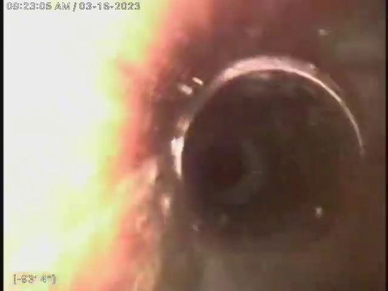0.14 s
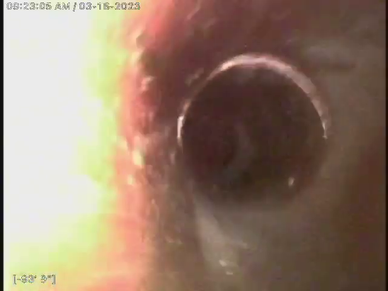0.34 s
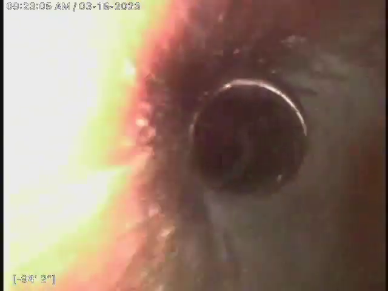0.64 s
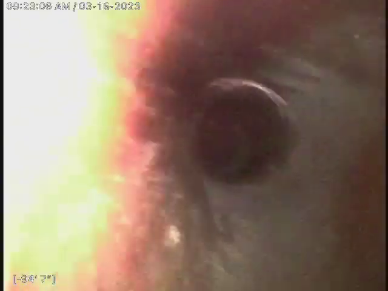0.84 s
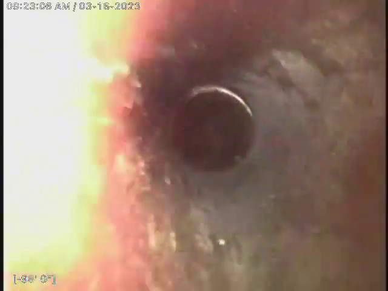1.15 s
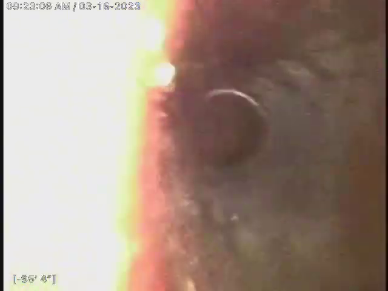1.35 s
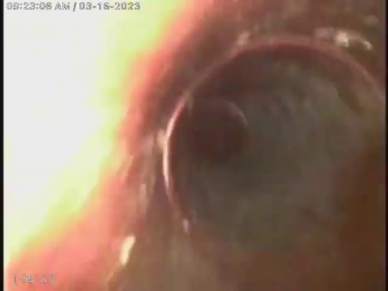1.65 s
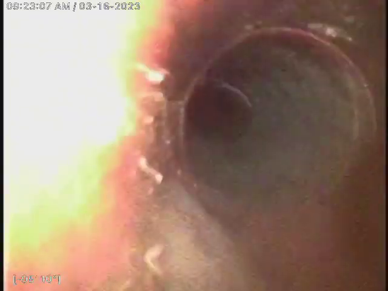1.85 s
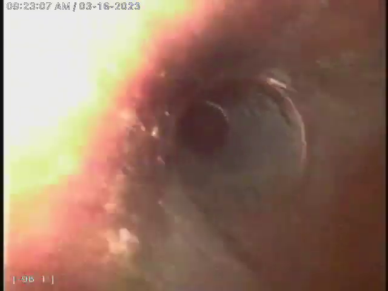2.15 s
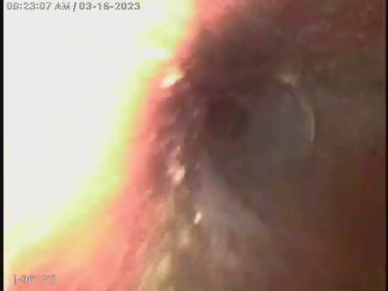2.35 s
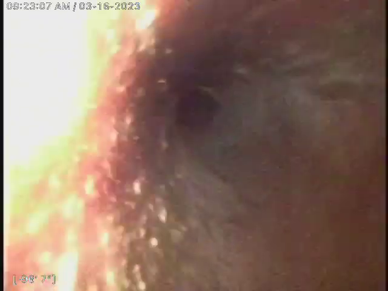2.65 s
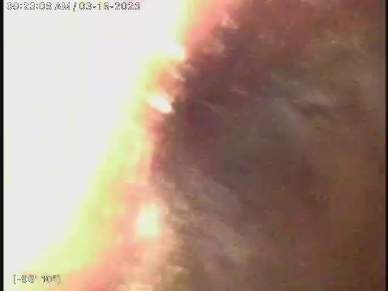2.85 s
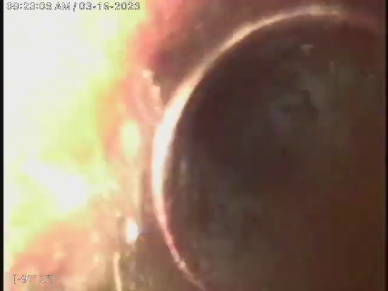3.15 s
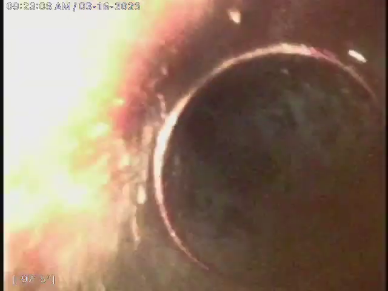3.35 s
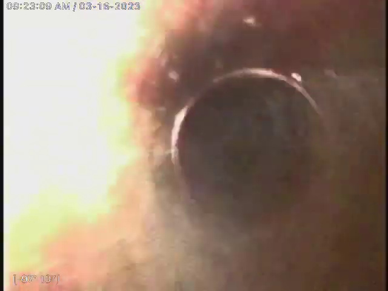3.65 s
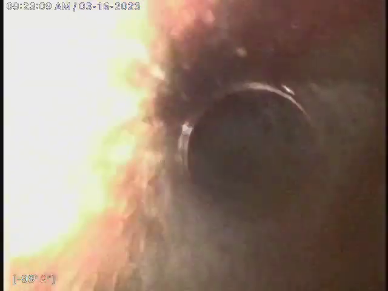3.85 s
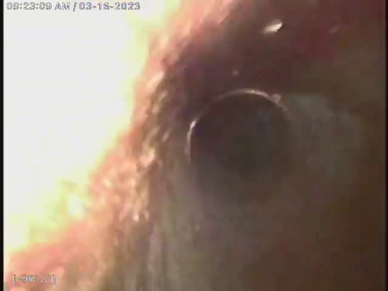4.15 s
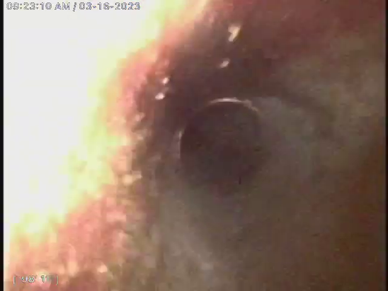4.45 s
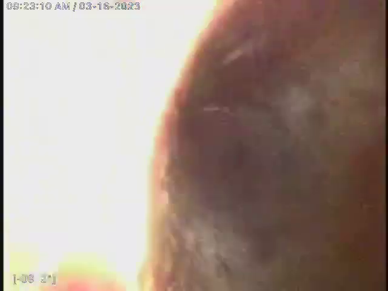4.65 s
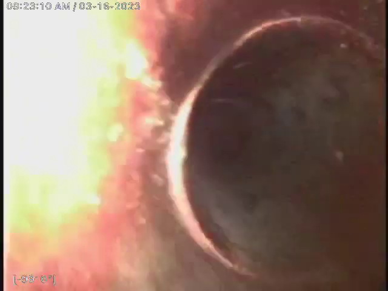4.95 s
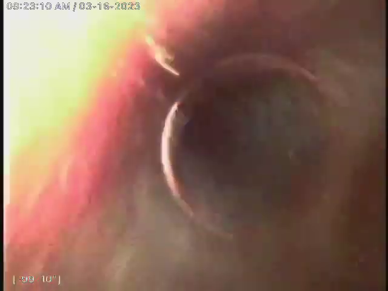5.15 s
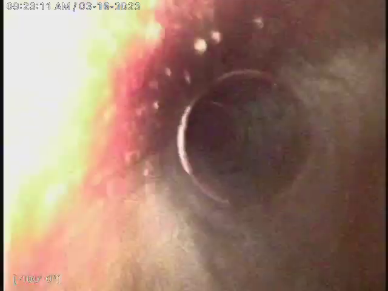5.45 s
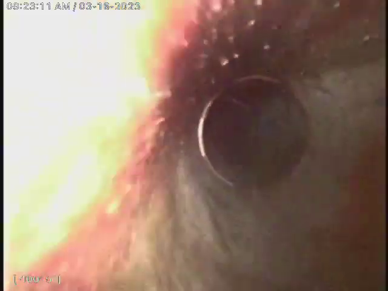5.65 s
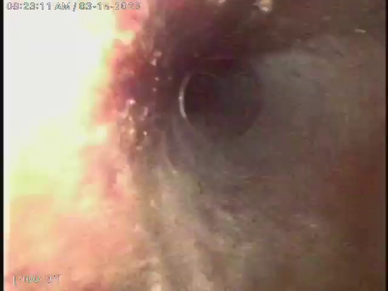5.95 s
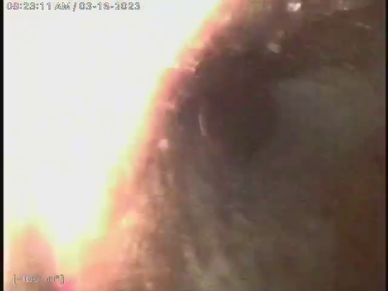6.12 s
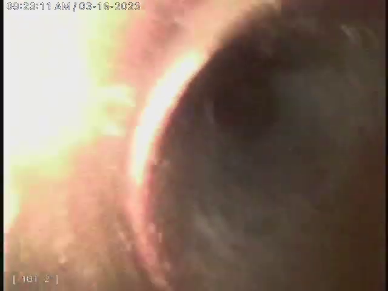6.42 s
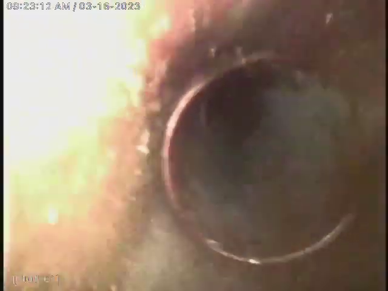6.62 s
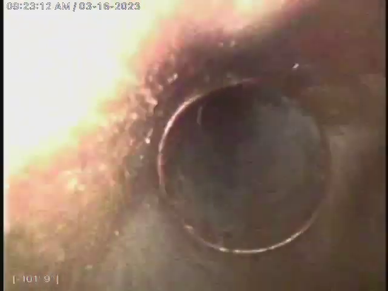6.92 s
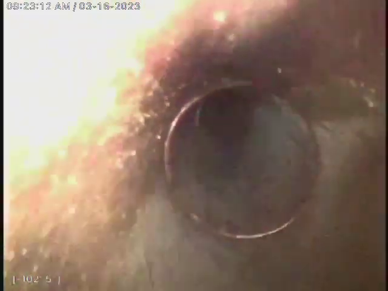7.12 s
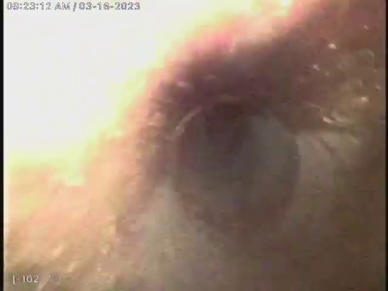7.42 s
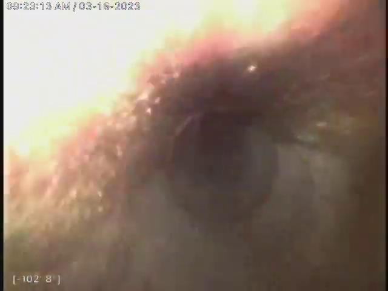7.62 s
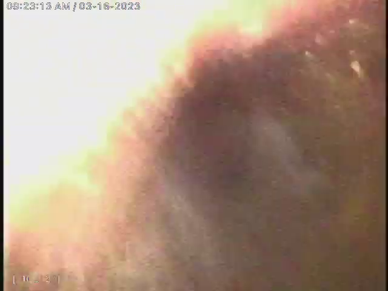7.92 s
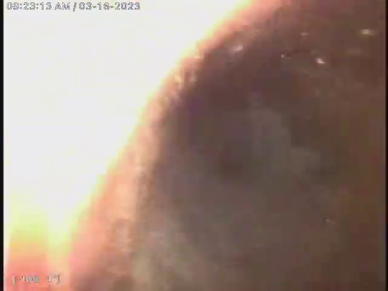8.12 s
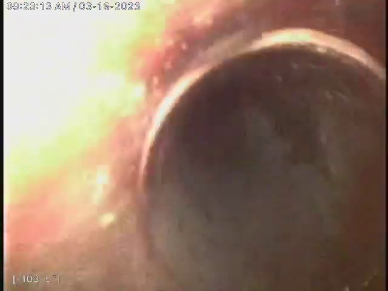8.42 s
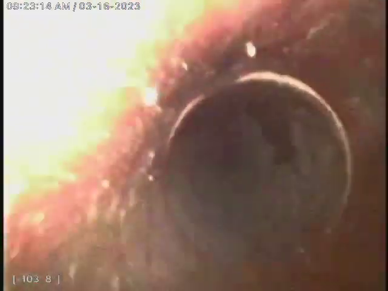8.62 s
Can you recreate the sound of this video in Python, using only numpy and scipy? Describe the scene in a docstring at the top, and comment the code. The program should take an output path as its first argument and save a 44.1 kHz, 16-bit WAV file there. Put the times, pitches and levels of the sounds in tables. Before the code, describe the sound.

A pipe inspection rod is pulled back throughout, about two pulls a second, each a soft, low, hollow rub that swells and fades with gritty ticks and occasional faint dry squeaks. A steady low drone and soft hiss lie underneath. The rod knocks and rattles in its reel, making the frame ring briefly. A loud, sharp clatter comes at 1.5 seconds, smaller knocks at 3.4 and 3.7, another loud clatter around 4.5, single knocks at 6.3 and 6.8, and a third loud clatter at 7.6. Light taps follow from 8 to 8.7 seconds. Some way off, a small bird faintly whistles, trills and gives a short buzz during the first three seconds. A more distant bird whistles and chirps from about 4 to 7 seconds. Everything is heard through one microphone at the rig, with little echo on the knocks and no high treble.

```python
"""A sewer camera's push rod is drawn back through a buried pipe, about two pulls a second.
The rod rubs on its guide, louder the faster it slides, with ticks of dirt and brief dry squeaks.
It knocks and rattles in the reel, and the reel's frame rings. Two small birds whistle and trill
some way off, over a low drone and hiss. The sound has no treble above 7 kHz."""
import sys
import numpy as np
from scipy import signal
from scipy.fft import rfft, irfft, next_fast_len
from scipy.io import wavfile

SR = 44100
rng = np.random.default_rng(int(sys.argv[2]) if len(sys.argv) > 2 else 0)


def pcm_store(signal):
    """Save signal as 16-bit PCM."""
    levels = np.round(np.clip(np.atleast_2d(signal), -1, 1) * 32767)
    wavfile.write(sys.argv[1], SR, levels.astype(np.int16).T)


N = 387198


# The pulls on the rod. Each row: start in seconds, length in seconds, relative level in dB.
PULLS = [(-0.05, 0.38, -43), (0.365, 0.43, -47), (0.903, 0.46, -52.5), (1.27, 0.69, -38.5),
         (1.948, 0.59, -43.5), (2.493, 0.57, -42.5), (2.865, 0.59, -49.5), (3.248, 0.75, -47),
         (3.94, 0.18, -48.5), (4.272, 0.55, -38), (4.861, 0.51, -39.5), (5.414, 0.81, -42.5),
         (6.193, 0.4, -41), (6.622, 0.37, -52.5), (7.07, 0.35, -45.5), (7.412, 0.65, -43.5),
         (8.044, 0.51, -43.5), (8.651, 0.45, -38.5)]

def pulls(skew=0.73, rub_power=1.85):
    """Each pull speeds up and slows again, so the rubbing swells and fades."""
    t, power = np.arange(N) / SR, np.zeros(N)
    for start, length, db in PULLS:
        progress = np.clip((t - start) / length, 0, 1)
        speed = abs(np.sin(np.pi * progress ** skew))  # a skew under 1 peaks early
        power += (gain_of(db) * speed ** rub_power) ** 2
    return np.sqrt(power)


# The tone of the rubbing. Each row: frequency in Hz, relative level in dB.
RUB_TONE = [(50, -15.5), (90, 9.5), (130, 10), (170, 14), (330, 7), (600, 0.5), (860, -5.5), (1450, -10),
            (2600, -12.5), (4000, -15.5), (6600, -24), (7000, -50)]

def rubbing(slide_db=2.5, grit_db=-8, creep_db=-59.5, flutter_db=2.5, sizzle_db=-14):
    """Sliding friction and grit, heard through the hollow reel; each pull adds a little hiss."""
    pull = pulls()
    creep = gain_of(creep_db) * lull()  # the rod creeps on between pulls
    friction = gain_of(slide_db) * noise(RUB_TONE) + gain_of(grit_db) * grit()
    sizzle = gain_of(sizzle_db) * pull * noise([(1500, -27), (4000, -1), (6500, 5.5), (7000, -22)])
    flutter = gain_of(flutter_db * wander(N, rate_hz=13.7))
    return (friction * np.hypot(pull, creep) + sizzle) * flutter


def grit(per_s=340, spread_db=3.5, quality=6.5, low_hz=760, high_hz=1170, pitches=8):
    """Dirt on the rod catches at random, each time with a short hollow tick."""
    ticks = np.zeros(N)
    for hz in np.linspace(low_hz, high_hz, pitches):
        size = gain_of(spread_db * np.minimum(rng.exponential(1, N), 3))
        catches = size * (rng.random(N) < per_s / pitches / SR)
        ticks += resonate(resonate(catches, hz, quality), hz, quality) / np.sqrt(hz)
    return evened(ticks)


# The rod's knocks. Each row: start in seconds, rattle level in dB, rattle length in seconds,
# added brightness in dB per octave, jolt level in dB, pitch of the clunk in Hz.
KNOCKS = [(0.64, -40, 0.027, 1.5, -33, 880), (0.690, -44, 0.0019, 6, -58, 1505),
          (1.325, -40.5, 0.0076, -1.5, -31.5, 299), (1.4599, -14.5, 0.0043, -2.5, -31, 643),
          (1.469, -9, 0.004, 0.5, -30, 380), (1.482, -10.5, 0.004, 0, -13.5, 1020),
          (1.4872, -11.5, 0.00872, 1, -13.5, 880), (1.648, -28, 0.0023, -2.5, -44, 520),
          (3.415, -26, .011, 1.5, -19, 235), (3.698, -28, 0.0027, -3, -31, 253),
          (4.4385, -16, .005, -1.5, -25, 800), (4.4455, -12.5, 0.015, -0.1, -28.5, 780),
          (4.464, -17.5, 0.0042, 3, -18, 277), (4.550, -21, 0.0045, 4.5, -25, 4130),
          (4.989, -37, 0.0022, -14, -41, 225), (5.042, -40, 0.0053, -5.5, -35, 228),
          (5.133, -31, 0.0064, 3.5, -50, 2070), (5.744, -53, 0.03, -11, -34.5, 95),
          (5.842, -42, 0.0052, -4, -43, 810), (6.3136, -21, .008, .5, -26.5, 340),
          (6.7974, -22, 0.008, -.5, -22.5, 168), (7.166, -41, 0.0019, -1.5, -49, 804),
          (7.6178, -14.5, 0.009, 0.5, -22, 680), (7.6301, -12.5, 0.012, 2.1, -17, 285),
          (7.6474, -12, 0.0039, 3, -17.5, 945), (7.794, -37, 0.028, -15, -35.5, 302),
          (8.074, -37.5, 0.002, -6.5, -52, 760), (8.126, -35.5, 0.012, -6, -47, 437),
          (8.156, -35, 0.002, -4, -40, 1090), (8.202, -39.5, 0.0026, -4, -46, 876),
          (8.235, -39, .003, -3, -44, 1090), (8.4566, -34, 0.0082, 2, -57, 2420),
          (8.682, -37.5, 0.023, -3.5, -46, 187), (8.733, -32.5, .035, -10.5, -52, 191)]
# The tone of the rattle. Each row: frequency in Hz, relative level in dB.
RATTLE_TONE = [(40, -40.5), (120, -9), (250, -1), (380, -2.5), (520, -8), (950, -9.5), (1300, -13),
               (1900, -15.5), (2800, -17), (4500, -24.5), (6800, -28)]
# The echo of the surroundings. Each row: frequency in Hz, seconds to fade by 60 dB.
ECHO_FADES = [(100, 0.51), (400, 0.24), (1500, 0.29), (6500, 0.38)]

def knocks(crack_s=0.0013, release_s=0.0059, bounces_per_s=7000, jolt_s=0.0006,
           clunk_db=3, thud_db=5, ring_db=-1, echo_db=-17):
    """The rod strikes the reel, chatters for a moment, and its weight jolts the frame."""
    t, ring = np.arange(SR // 4) / SR, frame_ring()
    push = np.exp(-t / jolt_s)
    jolt = signal.fftconvolve(ring, push / push.sum())  # a soft push wakes mostly low tones
    crack = np.exp(-t / crack_s)  # the first contact is the hardest
    rattles, jolts = np.zeros(N), np.zeros(N)
    for start, db, length, brightness, jolt_db, clunk_hz in KNOCKS:
        tone = [(hz, level + brightness * np.log2(hz)) for hz, level in RATTLE_TONE]
        contact = crack + np.exp(-np.maximum(t - length, 0) / release_s)
        bounces = contact * rng.standard_normal(len(t)) * (rng.random(len(t)) < bounces_per_s / SR)
        rattle = signal.fftconvolve(bounces, click(tone))
        # each struck spot favours its own pitch
        rattle += gain_of(clunk_db) * resonate(rattle, clunk_hz, quality=5)
        add(rattles, start, gain_of(db) * rattle * np.linalg.norm(contact) / np.linalg.norm(rattle))
        thud = jolt + gain_of(thud_db) * resonate(jolt, clunk_hz, quality=4)
        add(jolts, start + 0.85 * length, gain_of(jolt_db) * thud)  # late in the rattle
    # the chatter keeps the frame ringing too
    ringing = signal.fftconvolve(rattles, ring / abs(rfft(ring)).max())[:N]
    direct = along_rod(rattles + gain_of(ring_db) * ringing + jolts)
    return direct + gain_of(echo_db) * echoes(direct, ECHO_FADES)


# The reel frame's tones. Each row: pitch in Hz, relative level in dB, seconds to fade by 60 dB.
FRAME_TONES = [(94.8, 0.5, 0.16), (162.7, -6.5, 0.15), (199, -3.5, 0.12), (246.5, -9, 0.19),
               (270.4, -1.5, 0.11), (388.9, -5, 0.11), (659, -7, 0.12), (859, -12, 0.18),
               (1013, -12.5, 0.091), (1840, -13, 0.04), (2730, -6.5, 0.046)]

def frame_ring():
    """After one blow the frame rings with several fading tones at once."""
    t = np.arange(SR // 2) / SR
    return sum(gain_of(db - 60 * t / fade) * np.cos(2 * np.pi * hz * t) for hz, db, fade in FRAME_TONES)


def along_rod(x, lag_s=0.01149, corner_hz=479.5):
    """Low bending waves travel more slowly along the rod, so the bass arrives up to lag_s late."""
    size = next_fast_len(N + SR)
    turns = lag_s * corner_hz * np.arctan(np.fft.rfftfreq(size, 1 / SR) / corner_hz)
    return irfft(rfft(x, size) * np.exp(-2j * np.pi * turns), size)[:N]


# Dry brushes. Each row: middle in seconds, level in dB, half length in seconds, squeak pitch in Hz.
BRUSHES = [(0.12, -54.5, 0.23, 2420), (0.979, -48, 0.025, 2580), (1.111, -46.5, 0.039, 2420),
           (1.329, -48, 0.011, 2770), (2.705, -43, 0.027, 2500), (5.052, -53, 0.058, 2470),
           (5.659, -39.5, 0.015, 2460), (6.413, -41, 0.031, 2510)]
# The tone of a brush. Each row: frequency in Hz, relative level in dB.
BRUSH_TONE = [(300, -10.5), (900, 0.5), (1500, 7.5), (2600, 2), (3500, 1), (6800, -5.5)]

def brushes(flutter_db=2.5, squeak_db=8):
    """Short swells of dry, uneven friction, each with a faint squeak."""
    t, out = np.arange(SR // 2) / SR, np.zeros(N)
    middle = t.mean()
    for when, db, half, hz in BRUSHES:
        friction = noise(BRUSH_TONE, len(t)) * gain_of(flutter_db * wander(len(t), rate_hz=120))
        friction = evened(friction + gain_of(squeak_db) * resonate(friction, hz, quality=14))
        swell = np.exp(-.5 * ((t - middle) / half) ** 2)
        add(out, when - middle, gain_of(db) * friction * swell)
    return out


# The nearer bird's calls. Each row: start in seconds, relative level in dB.
OPENING_CALLS = [(.07, -52), (.455, -50), (0.786, -50)]
TWIN_CALLS = [(1.027, -45), (1.372, -46.5), (1.718, -49)]
# The notes in a call. Each row: delay in seconds, length in seconds, first pitch in Hz,
# last pitch in Hz, relative level in dB, pitch shake in Hz.
OPENING_NOTES = [(0, 0.068, 5353, 5290, 3.5, 12), (0.057, 0.033, 3780, 3080, 1.5, 98)]  # a whistle, then a downward slide
TWIN_NOTES = [(0, 0.12, 3777, 3728, 0.89, 9.2), (0, .115, 3960, 4000, 0.5, 4.8)]  # both sides of the bird's voice box whistle together
CHIP_NOTES = [(0, 0.016, 5670, 4360, 2.5, 249), (0.011, 0.03, 4680, 4660, -6.5, 110)]  # a steep tick with a faint held end
# The closing buzz: one note like those above, without the delay.
CLOSING_BUZZ = (0.22, 4490, 4250, -46.5, 70)

def near_bird(trill_at_s=1.858, chip_gap_s=0.089, chip_db=-54.5, buzz_at_s=2.57,
              echo_db=-11, fade_s=0.88, reflection_s=0.021, reflection_db=-10):
    """Whistles, twin notes, a trill of chips and a buzz, with an echo and one close reflection."""
    trill = [(trill_at_s + k * chip_gap_s, chip_db) for k in range(8)]
    song = calls(OPENING_CALLS, OPENING_NOTES)
    song += calls(TWIN_CALLS, TWIN_NOTES, sag_hz_per_s=100)
    song += calls(trill, CHIP_NOTES)
    add(song, buzz_at_s, note(*CLOSING_BUZZ, throb_hz=370))
    heard = song + gain_of(echo_db) * echoes(song, [(7000, fade_s)])  # all pitches fade alike
    add(heard, reflection_s, gain_of(reflection_db) * song)
    return heard


# The farther bird's repeated chirp. Each row: start in seconds, relative level in dB.
CHIRP_CALLS = [(4.725, -50.5), (5.83, -48), (6.0, -49.5), (6.19, -49), (6.365, -48.5), (6.55, -50),
               (6.735, -50.5)]
# The two notes in a chirp, with the same columns as OPENING_NOTES.
CHIRP_NOTES = [(0, 0.075, 4030, 3973, 1.3, 59.8), (.026, 0.05, 3966, 3100, 0, 120)]
# Single distant notes. Each row: start in seconds, then the same columns as CLOSING_BUZZ.
FAR_NOTES = [(4.145, 0.18, 6320, 6230, -53, 78.5), (4.587, 0.12, 6270, 6180, -50, 40.3),
             (5.05, 0.16, 6220, 6120, -55.5, 50.4), (5.199, 0.19, 4926, 4820, -47.5, 38),
             (5.40, .16, 4845, 4790, -59, 38), (5.612, 0.038, 3050, 3490, -47.5, 130),
             (5.635, 0.074, 3480, 3560, -46, 120)]

def far_bird(level_db=-4, fade_s=0.55):
    """Birdsong smeared by the surroundings: as much echo as direct sound."""
    song = calls(CHIRP_CALLS, CHIRP_NOTES)
    for start, *shape in FAR_NOTES:
        add(song, start, note(*shape))
    return gain_of(level_db) * (song + echoes(song, [(7000, fade_s)]))


def calls(starts, notes, sag_hz_per_s=0):
    """A bird sings the same call at each start; the pitch may sag from one to the next."""
    song = np.zeros(N)
    for start, db in starts:
        sag_hz = sag_hz_per_s * (start - starts[0][0])
        for delay, length, first_hz, last_hz, note_db, shake_hz in notes:
            whistle = note(length, first_hz - sag_hz, last_hz - sag_hz, db + note_db, shake_hz)
            add(song, start + delay, whistle)
    return song


def note(length, first_hz, last_hz, db, shake_hz, throb_hz=0, throb_rate_hz=265):
    """A gliding whistle: an uneven shake of its pitch makes it rasp, a regular throb makes it buzz."""
    n = int(length * SR)
    throb = throb_hz * np.sin(2 * np.pi * throb_rate_hz * np.arange(n) / SR)
    hz = np.linspace(first_hz, last_hz, n) + shake_hz * wander(n, rate_hz=190) + throb
    whistle = np.sqrt(2) * np.sin(2 * np.pi * np.cumsum(hz) / SR)
    return gain_of(db) * whistle * signal.windows.tukey(n, .5)


# The tones of the drone and the hiss. Each row: frequency in Hz, relative level in dB.
DRONE_TONE = [(20, -29), (35, -19), (54, 0.5), (72, -4), (95, -2.5), (135, -12.5), (180, -5.5),
              (300, -18.5), (1500, -41), (6800, -77)]
HISS_TONE = [(300, 7), (1000, 9), (1900, 1), (2500, 8.5), (3400, 0), (5000, 2), (5800, 2), (6400, 5),
             (6750, -4), (7000, -36.5)]

def background(drone_db=-42.5, drone_waver_db=1, hiss_db=-53.5, hiss_waver_db=1.8):
    """A wavering low drone under a soft hiss."""
    drone = noise(DRONE_TONE) * gain_of(drone_db + drone_waver_db * wander(N, rate_hz=4.7))
    hiss = noise(HISS_TONE) * gain_of(hiss_db + hiss_waver_db * wander(N, rate_hz=2))
    return drone + hiss * lull()


def lull(middle_s=6.975, half_s=0.046, depth_db=-8):
    """One brief dip in the level of the hiss and the creeping rod."""
    return gain_of(depth_db * np.exp(-.5 * ((np.arange(N) / SR - middle_s) / half_s) ** 2))


def echoes(x, fades):
    """Many reflections blur into a tail, each pitch fading in the time given for it."""
    hz, t, bands = signal.stft(rng.standard_normal(SR), SR, nperseg=256)
    decay = gain_of(-60 * t / value_at(fades, hz)[:, None])
    tail = signal.istft(bands * decay, SR, nperseg=256)[1]
    return signal.fftconvolve(x, tail / np.linalg.norm(tail))[:N]


def resonate(x, hz, quality):
    """Keeps the sound near one pitch; a higher quality rings longer."""
    return signal.lfilter(*signal.iirpeak(hz, quality, SR), x)


def click(tone, size=4096):
    """A click with this tone and no sound before it starts."""
    log_gain = np.log(gain_of(value_at(tone, abs(np.fft.fftfreq(size, 1 / SR)))))
    return np.fft.ifft(np.exp(np.conj(signal.hilbert(log_gain)))).real


def noise(tone, n=N):
    """Steady noise with this tone."""
    gains = gain_of(value_at(tone, np.fft.rfftfreq(n, 1 / SR)))
    return evened(irfft(rfft(rng.standard_normal(n)) * gains, n))


def wander(n, rate_hz):
    """A smooth random wobble, mostly slower than rate_hz."""
    hz = np.fft.rfftfreq(n, 1 / SR)
    return evened(irfft(rfft(rng.standard_normal(n)) / (1 + (hz / rate_hz) ** 4), n))


def value_at(table, hz):
    """Looks up a frequency in a table, blending between rows."""
    row_hz, values = np.transpose(table)
    return np.interp(np.log(hz + 1), np.log(row_hz + 1), values)


def gain_of(db):
    """Turns decibels into a multiplier."""
    return 10 ** (np.asarray(db) / 20)


def evened(x):
    """Scales a signal to an average (rms) level of 1."""
    return x / np.sqrt(np.mean(x ** 2) + 1e-20)


def add(mix, start_s, sound):
    """Mixes a sound in at start_s."""
    part = mix[max(round(start_s * SR), 0):][:len(sound)]
    part += sound[:len(part)]


def scene():
    """Everything at the rig's one microphone."""
    return (knocks() + rubbing() + brushes() + background() + near_bird() + far_bird())[None]


def record(dry, top_hz=7000):
    """Rounds off the loudest knocks and cuts the treble above top_hz."""
    lowpass = signal.firwin(361, top_hz, window=("kaiser", 7), fs=SR)
    return signal.oaconvolve(np.tanh(dry), lowpass[None], "same")


dry = scene()
out = record(dry)
pcm_store(out)
```